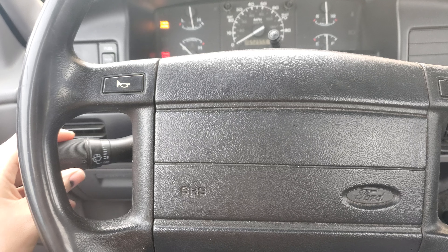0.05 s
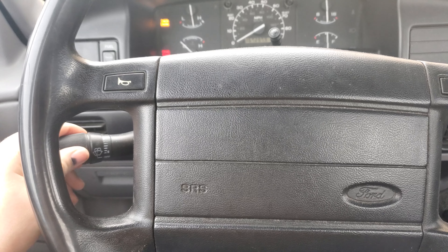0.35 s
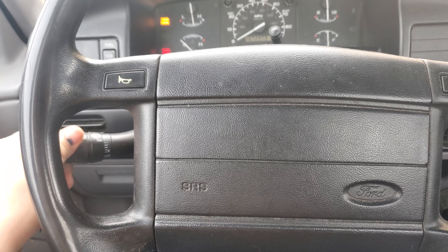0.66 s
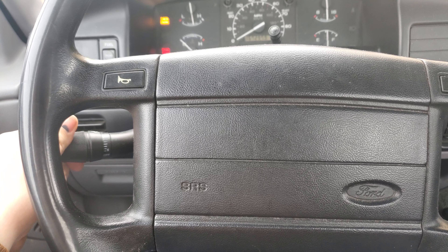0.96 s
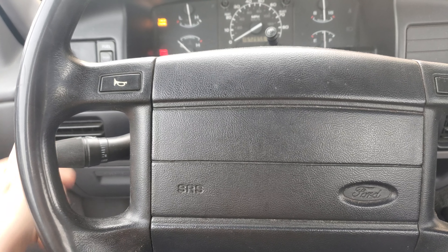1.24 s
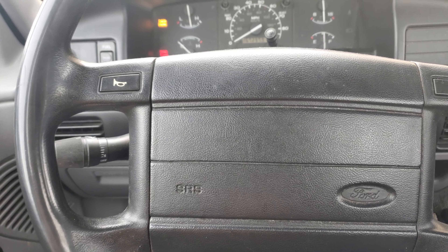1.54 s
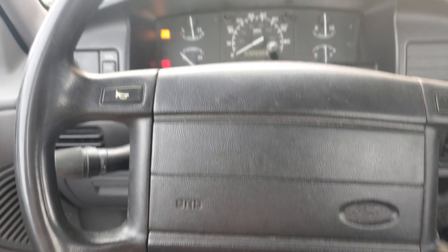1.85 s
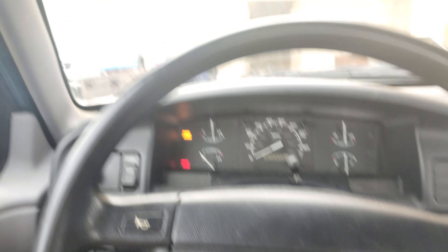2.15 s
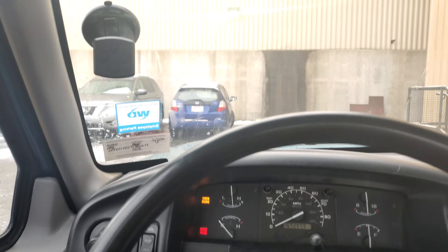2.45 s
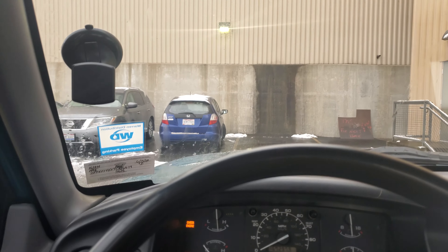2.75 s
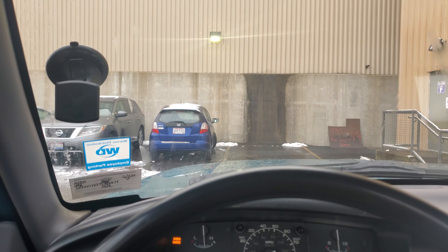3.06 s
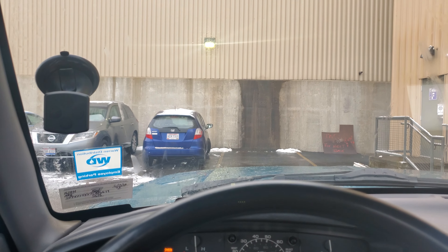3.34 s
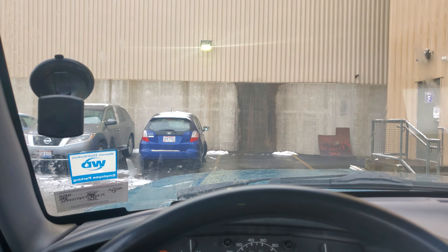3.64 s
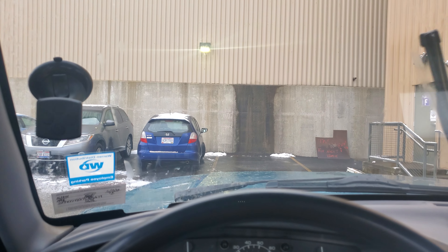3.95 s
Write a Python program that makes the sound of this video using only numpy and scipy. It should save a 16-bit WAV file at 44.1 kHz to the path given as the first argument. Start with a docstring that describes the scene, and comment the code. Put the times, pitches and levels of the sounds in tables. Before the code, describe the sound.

A wiper stalk clicks rapidly through its notches over a low idling engine inside a vehicle.

```python
"""Inside an idling vehicle, the engine drones through the cabin and the wiper motor whines.
A hand twists the wiper stalk through its notches: at each one a small catch snaps into place, making
a quick run of sharp plastic clicks, with three duller rattles among them and soft knocks of the loose
handle. The rubber blades sing on the glass on every second sweep and thump at each end of their travel.
Later come a faint rustle and a few small ticks."""
import sys
import numpy as np
from scipy import signal
from scipy.fft import rfft, irfft
from scipy.io import wavfile
from scipy.ndimage import uniform_filter1d

SR = 44100
rng = np.random.default_rng(int(sys.argv[2]) if len(sys.argv) > 2 else 0)


def file_out(sig):
    """Save sig as 16-bit WAV at sys.argv[1]."""
    # one column per channel
    cols = np.atleast_2d(sig).T
    # limit, then scale
    lim = np.clip(cols, -1, 1)
    pcm = np.round(lim * 32767).astype(np.int16)
    wavfile.write(sys.argv[1], SR, pcm)


N = 176400
T = np.arange(N) / SR
HIT_SIZE = 16384   # samples in one click, tick or thump
HIT_T = np.arange(HIT_SIZE) / SR
HIT_HZ = np.fft.rfftfreq(HIT_SIZE, 1 / SR)


def from_db(db):
    """Turn decibels (dB) into a number to multiply by."""
    return 10 ** (np.asarray(db) / 20)


def rms_one(x):
    """Scale x so that its average size (rms) is 1."""
    return x / np.sqrt(np.mean(x ** 2) + 1e-20)


def curve(rows):
    """Join (seconds, value) points with straight lines."""
    return np.interp(T, *np.transpose(rows))


def on_bins(rows, size, column=1):
    """Read one column of a table at every frequency of a spectrum."""
    rows = np.array(rows, float)
    hz = np.fft.rfftfreq(size, 1 / SR)
    return np.interp(np.log(hz + 1), np.log(rows[:, 0]), rows[:, column])


def drift(rate_hz):
    """A random wobble of size 1, mostly slower than rate_hz."""
    hz = np.fft.rfftfreq(N, 1 / SR)
    spectrum = rfft(rng.standard_normal(N)) * (hz > 0)
    return rms_one(irfft(spectrum / (1 + (hz / rate_hz) ** 2) ** 2, N))


def fade(t, fade_s):
    """Start at t = 0 and die away, losing 60 dB in the fade time fade_s."""
    return (t >= 0) * from_db(-60 * np.maximum(t, 0) / fade_s)


def swell(rise_s, fade_s):
    """Rise in a straight line, then die away."""
    return np.minimum(HIT_T / rise_s, 1) * fade(np.maximum(HIT_T - rise_s, 0), fade_s)


def coloured(x, gain):
    """Give each frequency its own gain, with no ringing ahead of the sound (minimum phase)."""
    cepstrum = irfft(np.log(gain + 1e-9))
    half = cepstrum.shape[-1] // 2
    cepstrum[..., 1:half] *= 2
    cepstrum[..., half + 1:] = 0
    return irfft(rfft(x) * np.exp(rfft(cepstrum)))


def lean(db):
    """Gains for the two ears that make the left louder than the right by db."""
    return from_db(db * np.array([[.5], [-.5]]))


def cabin_noise(size):
    """Stereo hiss, alike in both ears only in the bass and leaning right in the upper middle."""
    # Each row: frequency in Hz, how alike the ears are (1 the same, 0 unrelated, -1 opposite).
    likeness = [(30, 0.94), (90, 1), (170, 0.9), (350, 0.71), (700, 0.29), (1300, -0.26), (2600, 0.0011),
                (6000, 0), (16000, -0.14)]
    # Each row: frequency in Hz, left minus right in dB.
    balance = [(60, 1.9), (150, 2.7), (330, 2), (800, -1), (1800, -0.5), (3000, -5), (6500, -5.5),
               (9000, 1.5), (16000, 4)]
    alike = np.clip(on_bins(likeness, size), -.999, .999)
    mid, side = rfft(rng.standard_normal((2, size)))
    ears = np.sqrt((1 + alike) / 2) * mid + np.sqrt((1 - alike) / 2) * side * [[1], [-1]]
    return irfft(lean(on_bins(balance, size)) * ears, size)


def steady_noise(colour):
    """Cabin noise of size 1, shaped by a table of (Hz, dB) points."""
    return rms_one(irfft(rfft(cabin_noise(N)) * from_db(on_bins(colour, N)), N))


def add(out, start_s, sound):
    """Mix a sound into out at the given time."""
    i = max(int(start_s * SR), 0)
    out[:, i:i + sound.shape[-1]] += sound[:, :max(N - i, 0)]


def engine():
    """The engine's firing makes low, unsteady tones over a broad rumble and the air of the vents."""
    # Each row: time in seconds, firings per second.
    firing_rate = [(0, 44.18), (1.5, 44.09), (3.0, 44.32), (3.4, 43.6), (4, 43.77)]
    # Each row: multiple of the firing rate, level in dB, wobble as a share of the tone's size.
    tones = [(1, -45.5, 0.36), (1.5, -32.5, .16), (2, -22, 0.091), (2.5, -41, 0.63), (3, -38.5, 0.12),
             (3.25, -40.5, 0.09), (3.5, -45.5, 0.229), (5, -58, 0.36), (6.72, -54.5, 0.65)]
    # Each row: frequency in Hz, relative strength of the rumble and vent air in dB.
    rumble_colour = [(15, -30), (24, -21), (38, -4), (55, 1.5), (90, -0.5), (125, -2.5), (160, -7.5),
                     (190, -19), (300, -18.5), (480, -23), (680, -32), (900, -29.5), (1200, -35.5),
                     (2200, -41.5), (2700, -46.5), (6500, -50), (8000, -66.5), (16000, -67.5)]
    phase = 2 * np.pi * np.cumsum(curve(firing_rate) * (1 + .0027 * drift(4.9))) / SR
    drone = np.zeros(N)
    for multiple, db, unsteadiness in tones:
        wobble = 1 + unsteadiness * (drift(13) + 1j * drift(13))   # moves both level and phase
        tone = np.exp(1j * (multiple * phase + rng.uniform(0, 2 * np.pi)))
        drone += np.sqrt(2) * from_db(db) * np.real(wobble * tone)
    rumble_db = -30 + 1.22 * drift(25)
    return drone + from_db(rumble_db) * steady_noise(rumble_colour)


def wipers():
    """The motor's whine sags under load in mid-sweep, and the rubber sings on the glass."""
    # Each row: middle in seconds, half-length in seconds, pitch in Hz, glide in Hz per second,
    # pitch wobble in Hz, level in dB.
    blade_songs = [(.86, 0.13, 812, 0, 6, -56), (2.27, 0.16, 851, 98.5, 17, -55),
                   (3.607, 0.2, 846, 70.5, 17, -55)]
    turn_s, sweep_s, motor_hz = .61, .685, 429.4   # one turning point, one sweep's length, top pitch
    load = np.sin(np.pi * (T - turn_s) / sweep_s) ** 2
    whine_hz = motor_hz * (1 - .016 * load + .008 * drift(11))
    whine_db = -53.5 + .97 * drift(14)
    out = np.sqrt(2) * from_db(whine_db) * np.sin(2 * np.pi * np.cumsum(whine_hz) / SR)
    for middle_s, half_s, hz, glide, wobble_hz, db in blade_songs:
        song_hz = hz + glide * (T - middle_s) + wobble_hz * drift(40)
        song = np.sqrt(2) * np.sin(2 * np.pi * np.cumsum(song_hz) / SR)
        in_and_out = np.exp(-((T - middle_s) / half_s) ** 4)
        out += from_db(db + 2 * drift(20)) * song * in_and_out
    return out


def stalk_clicks():
    """At each notch the catch rides up, snaps and bounces; switch, steering column and cabin ring."""
    # Each row: time in seconds, overall gain in dB, cabin ring in dB, then the boost in dB
    # for each of three parts: steering column, handle and catch.
    notches = [(0.5203, -16.5, -6, 12, 8.5, 8.5), (0.5423, -14, -8.5, 0, -2.5, -7),
               (0.5698, -11, -12, -9.5, 8, -4.5), (0.6104, -11, -11, -4.5, 1, -2),
               (0.6566, -10.5, -13.5, -3, 5, -3), (0.7121, -12, -13.5, 5, -6, 3.5),
               (0.7638, -12, -13.5, 2.5, -3, 0), (.9611, -16.5, -9.5, 9, 2.5, 8.5)]
    # Each row: frequency in Hz, relative strength in dB, left minus right in dB.
    click_colour = [(300, -23.5, 1), (989, -27, -14), (2500, -17.5, 5.5), (2900, -9.5, -4), (3700, -9.5, 0),
                    (4340, -4, -5), (5350, -4, -4), (6016, -5.5, -5), (6830, 2.5, -4), (7560, -0.5, 0.5),
                    (8000, -9, 2.5), (8470, -3, 3), (9650, -6, 7), (10600, -1.5, 2), (11750, 3, 6),
                    (13960, 0, 4), (15650, -.5, 5.5), (16050, -11, 0)]
    # Each row: pitch at which the switch rings in Hz, relative level in dB, fade time in seconds.
    switch_tones = [(3100, -34.5, .04), (4280, -24.5, 0.0493), (5730, -25, .04), (6400, -23.5, .045),
                    (6720, -23.5, 0.06), (7180, -26, .05), (11350, -19.5, .04), (11650, -24, .03),
                    (12640, -22.5, .04), (13400, -22, 0.0346), (14700, -15, .035)]
    ride_up_s, longest_bounce_s, snap_fade_s, right_lag_s = .013, .0023, .0036, .00035
    sameness = .17   # share of the noise power that all clicks have in common
    # Column, handle and catch each boost one broad band of frequencies.
    part_bands = np.array([np.exp(-(np.log2((HIT_HZ + 1) / hz) / octaves) ** 2)
                           for hz, octaves in [(1714, .66), (3326, .25), (9190, .29)]])
    colour = rms_one(from_db(on_bins(click_colour, HIT_SIZE)))
    colour = colour * lean(on_bins(click_colour, HIT_SIZE, column=2))
    dull = 1 / (1 + ((HIT_HZ + 1) / 1900) ** 4)   # turns down everything above 1900 Hz
    t = np.array([HIT_T, HIT_T - right_lag_s]) - ride_up_s   # time since the snap, in each ear
    strike = from_db(4) * np.diff(1.0 * (t >= 0), prepend=0)   # the catch's first contact: one spike
    shared_noise = rng.standard_normal((2, HIT_SIZE))
    out = np.zeros((2, N))
    for snap_s, db, cabin_db, *parts_db in notches:
        fresh_noise = rng.standard_normal((2, HIT_SIZE))
        noise = np.sqrt(sameness) * shared_noise + np.sqrt(1 - sameness) * fresh_noise
        noise /= np.sqrt(uniform_filter1d(noise ** 2, size=12))   # even out its loudness
        ride_up = from_db(-32) * fade(-t, ride_up_s)
        snap = from_db(-.5) * fade(t, snap_fade_s)
        bounce = from_db(-.5) * fade(t - longest_bounce_s * rng.uniform(.92, 1), snap_fade_s)
        shell = from_db(-8) * fade(t, fade_s=.015)
        cabin = from_db(cabin_db) * fade(t, fade_s=.073)
        burst = noise * np.sqrt(ride_up ** 2 + snap ** 2 + bounce ** 2 + shell ** 2 + cabin ** 2)
        column = from_db(-8) * coloured(rng.standard_normal((2, HIT_SIZE)) * fade(t, fade_s=.12), dull)
        click = strike + burst + column
        for hz, tone_db, fade_s in switch_tones:
            loudness = from_db(tone_db + rng.normal(0, 3.5)) * fade(t, fade_s)
            ring_hz = hz * (1 + rng.normal(0, .004))
            click += loudness * np.sin(2 * np.pi * ring_hz * t + rng.uniform(0, 2 * np.pi, (2, 1)))
        boost = from_db(np.dot(parts_db, part_bands))
        add(out, snap_s - ride_up_s, from_db(db) * coloured(click, colour * boost))
    return out


def ticks_and_rustle():
    """The stalk gives three duller rattles among its clicks; later come a faint rustle and ticks."""
    # Each row: time in seconds, level of the rustle in dB.
    rustle_level = [(0, -94), (.7, -78), (1.02, -67.5), (1.14, -67), (1.25, -59.5), (1.38, -61),
                    (1.46, -56.5), (1.54, -67), (1.8, -92.5), (2.1, -66.5), (2.42, -62), (2.7, -74),
                    (3.1, -87.5), (3.6, -83), (3.78, -67.5), (4, -77.5)]
    # Each row: frequency in Hz, relative strength in dB.
    rustle_colour = [(800, -17.5), (3000, 7), (6000, 4.5), (8000, -6.5), (11500, 2), (13800, -3.5),
                     (15400, -0.5), (16100, -11.5)]
    # Each row: start in seconds, level in dB, fade time in seconds, centre in Hz, width in octaves.
    # The first three rows are the stalk's duller rattles.
    rattles_and_ticks = [(.526, -32, 0.024, 2850, .3), (.627, -43, 0.074, 4200, .9),
                         (.725, -40.5, 0.083, 1540, .5), (1.417, -50.5, 0.097, 4200, 0.75),
                         (2.2077, -29, 0.0051, 3300, 1), (2.552, -52, 0.12, 2580, 0.41),
                         (2.656, -54.5, 0.082, 2500, 0.78), (3.223, -40.5, 0.051, 4900, 0.84),
                         (3.27, -49.5, 0.051, 3300, 0.56), (3.348, -46, 0.04, 3800, 0.54)]
    out = from_db(curve(rustle_level)) * steady_noise(rustle_colour)
    treble_cut = 1 / np.sqrt(1 + ((HIT_HZ + 1) / 7200) ** 6)
    for start_s, db, fade_s, hz, octaves in rattles_and_ticks:
        band = 1 / (1 + (np.log2((HIT_HZ + 1) / hz) / octaves) ** 2)
        burst = cabin_noise(HIT_SIZE) * fade(HIT_T, fade_s)
        add(out, start_s, from_db(db) * coloured(burst, rms_one(band * treble_cut)))
    return out


def handle_rattles():
    """The loose handle knocks softly just before or after some notches."""
    # Each row: start in seconds, level in dB.
    rattles = [(.5685, -31), (.5845, -37.5), (.6385, -36.5), (.6685, -32.5), (.7112, -31.5), (.7245, -40.5),
               (0.7651, -23), (.9575, -37.5)]
    # Each row: frequency in Hz, relative strength in dB.
    rattle_colour = [(600, -16.5), (1500, -10), (3000, -5.5), (5000, -0.5), (6800, 3.5), (8200, -9.5),
                     (12000, -7.5), (16000, -7)]
    colour = rms_one(from_db(on_bins(rattle_colour, HIT_SIZE)))
    out = np.zeros((2, N))
    for start_s, db in rattles:
        burst = cabin_noise(HIT_SIZE) * fade(HIT_T, fade_s=.022)
        add(out, start_s, from_db(db) * coloured(burst, colour))
    return out


def blade_thumps():
    """At each turn the blades flip over with a scuff and a body panel booms."""
    # Each row: start in seconds; the scuff's level in dB, fade time in seconds and treble boost in dB;
    # the boom's pitch in Hz, level in dB and fade time in seconds.
    thumps = [(.590, -26.5, 0.25, 0.5, 271, -29, 0.089), (1.285, -27.5, 0.06, -5.5, 241.4, -22.5, 0.039),
              (1.303, -36, .06, -6, 48, -22, .13), (1.918, -27, 0.064, 0, 381, -30.5, 0.054),
              (1.964, -26.5, 0.19, 0, 154.6, -24, 0.12), (2.649, -27, 0.084, 3.5, 253, -22, 0.042),
              (2.660, -33.5, .1, -9, 51.2, -13, .16), (2.693, -32.5, .06, -5, 254, -31, 0.057),
              (3.272, -31.5, 0.22, 4.5, 356, -34, 0.064), (3.335, -26, 0.28, 7, 174, -17.5, 0.22)]
    # Each row: frequency in Hz, relative strength in dB.
    scuff_colour = [(25, -12), (50, -5), (160, 4.5), (230, 1), (420, -4.5), (650, -16.5), (850, -17.5),
                    (1500, -35), (3000, -40.5), (7000, -55.5), (11000, -75)]
    colour = rms_one(from_db(on_bins(scuff_colour, HIT_SIZE)))
    treble = 1 - 1 / (1 + (HIT_HZ / 580) ** 4)   # goes from 0 to 1 around 580 Hz
    out = np.zeros((2, N))
    for start_s, scuff_db, scuff_fade_s, treble_db, boom_hz, boom_db, boom_fade_s in thumps:
        burst = cabin_noise(HIT_SIZE) * swell(rise_s=.0074, fade_s=scuff_fade_s)
        scuff = coloured(burst, colour * from_db(treble_db * treble))
        boom_rise_s = min(2 / boom_hz, .014)   # two swings of the panel, 14 ms at most
        boom = swell(boom_rise_s, boom_fade_s) * np.sin(2 * np.pi * boom_hz * HIT_T)
        add(out, start_s, from_db(scuff_db) * scuff + from_db(boom_db) * boom)
    return out


def scene():
    """Everything heard from the driver's seat."""
    return stalk_clicks() + handle_rattles() + engine() + wipers() + blade_thumps() + ticks_and_rustle()


def record(dry):
    """The microphone opens after a moment; sharp peaks are rounded and the highest treble is cut."""
    start_s, opening_s, peak_limit, cutoff_hz = .069, .0031, .8, 16350
    opened = np.clip((T - start_s) / opening_s, 0, 1)
    rounded = dry / (1 + (dry / peak_limit) ** 6) ** (1 / 6)
    low_pass = signal.ellip(10, .2, 80, cutoff_hz, fs=SR, output="sos")
    return signal.sosfilt(low_pass, rounded * opened)


dry = scene()
out = record(dry)
file_out(out)
```